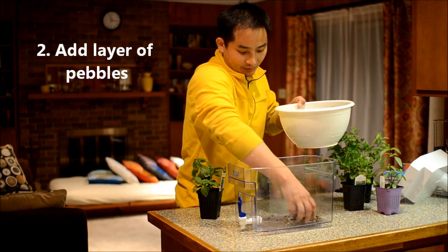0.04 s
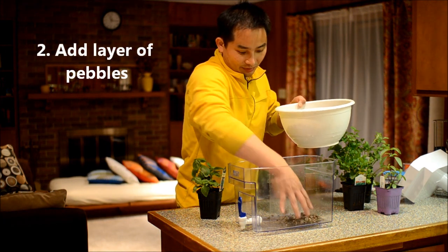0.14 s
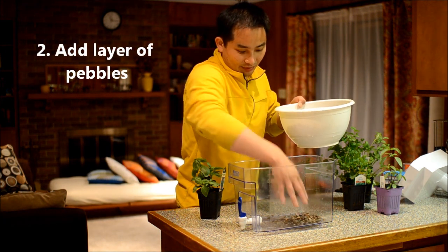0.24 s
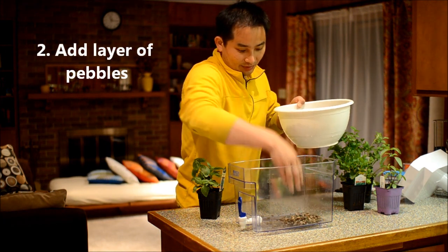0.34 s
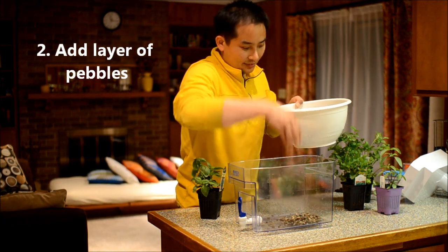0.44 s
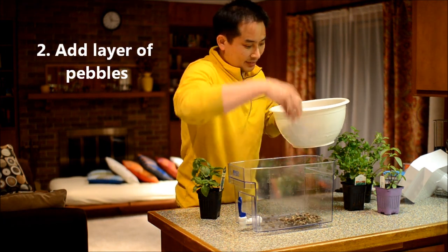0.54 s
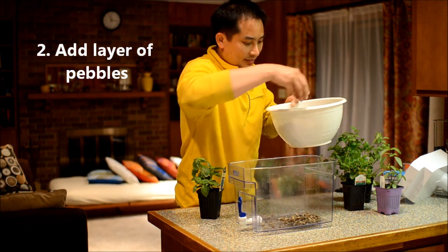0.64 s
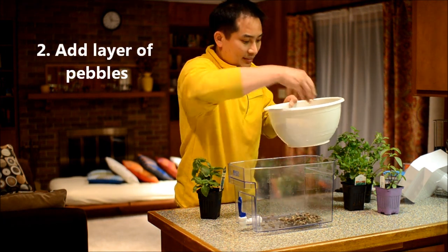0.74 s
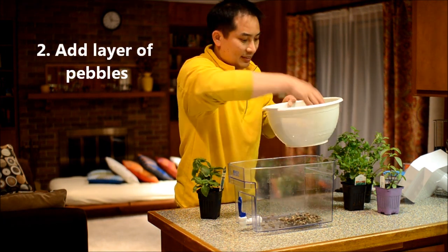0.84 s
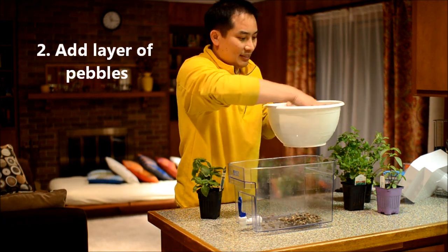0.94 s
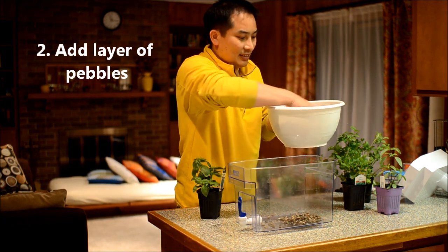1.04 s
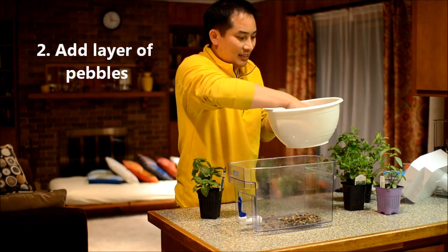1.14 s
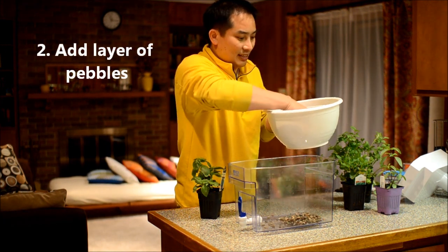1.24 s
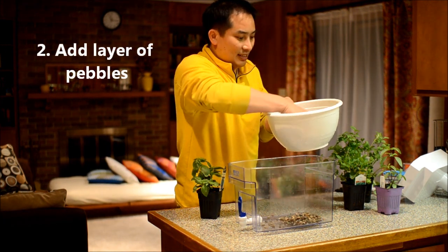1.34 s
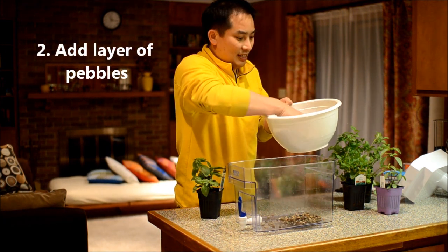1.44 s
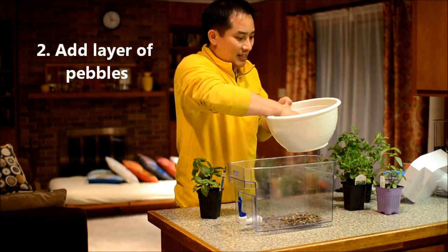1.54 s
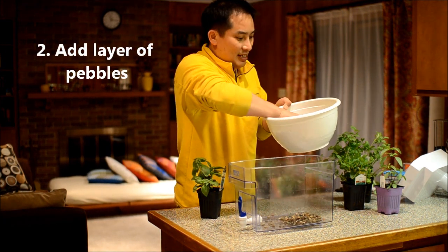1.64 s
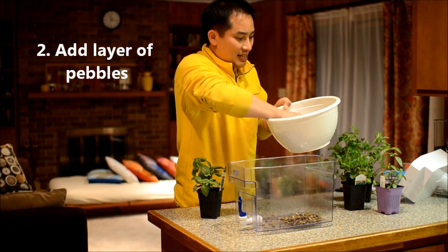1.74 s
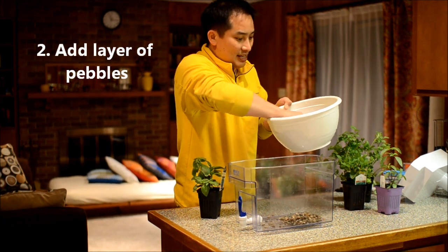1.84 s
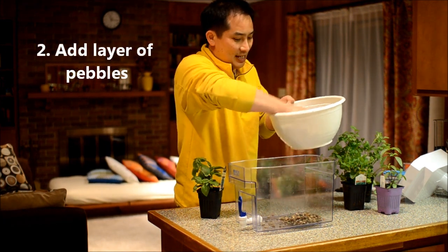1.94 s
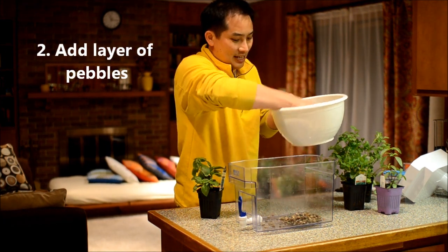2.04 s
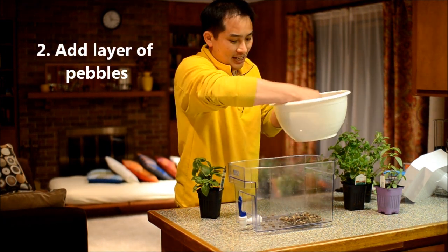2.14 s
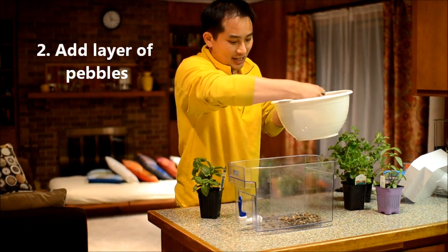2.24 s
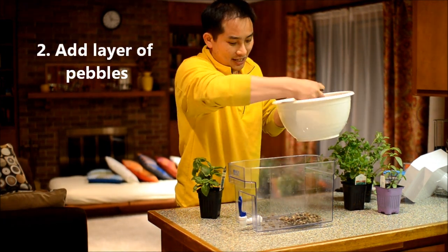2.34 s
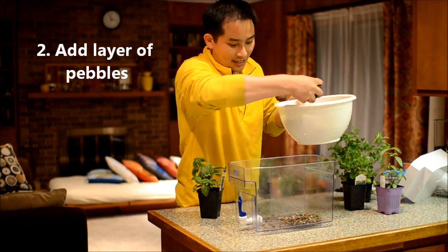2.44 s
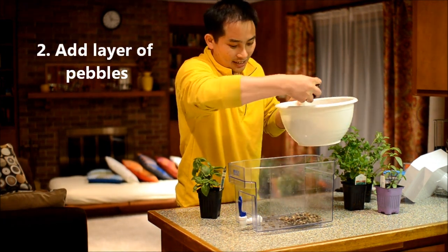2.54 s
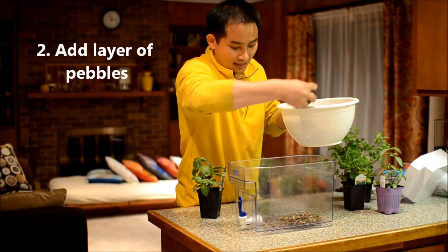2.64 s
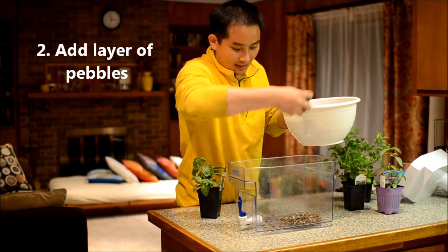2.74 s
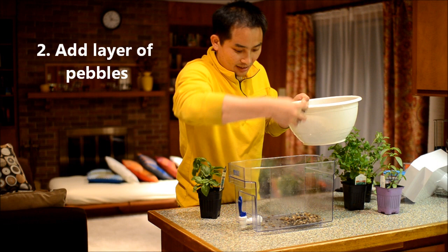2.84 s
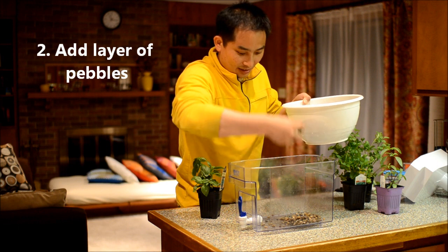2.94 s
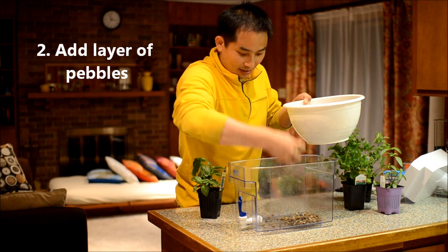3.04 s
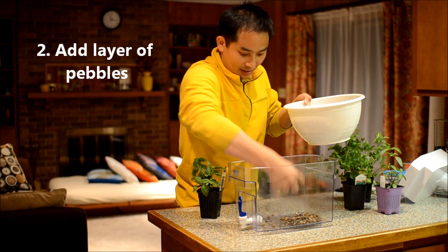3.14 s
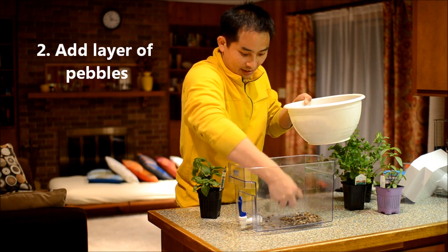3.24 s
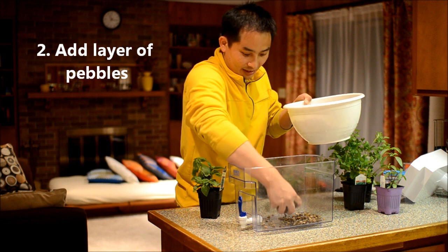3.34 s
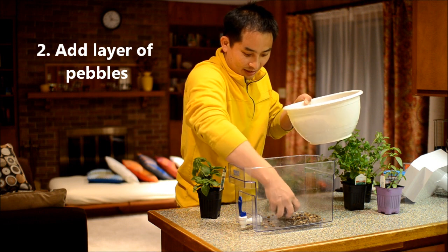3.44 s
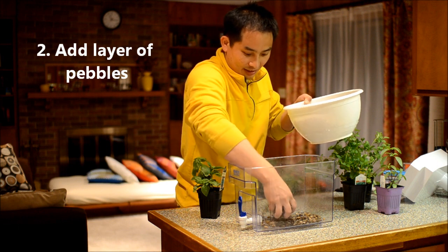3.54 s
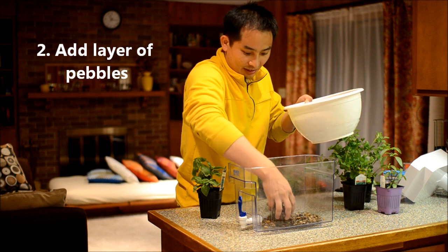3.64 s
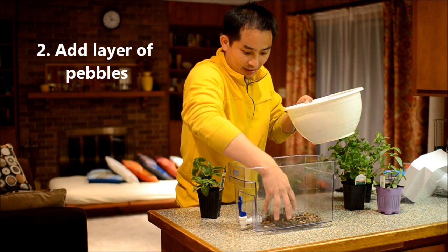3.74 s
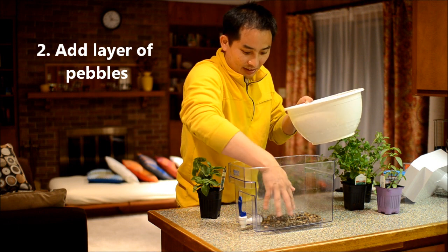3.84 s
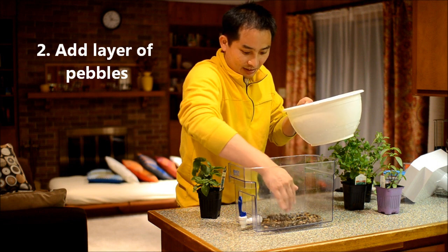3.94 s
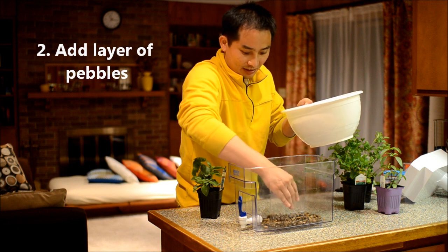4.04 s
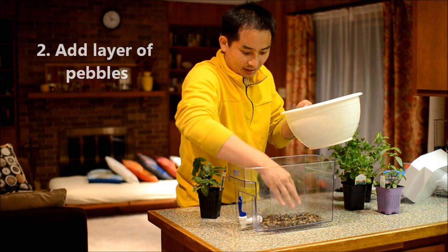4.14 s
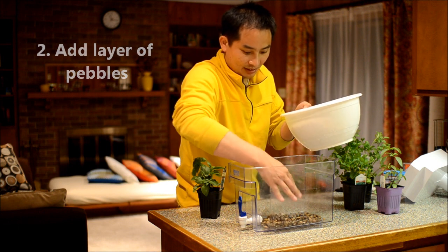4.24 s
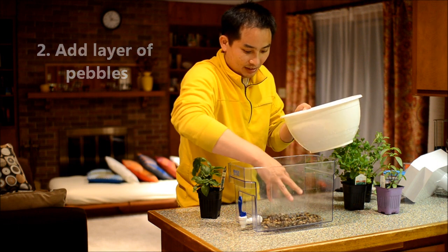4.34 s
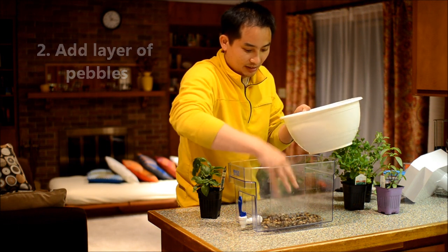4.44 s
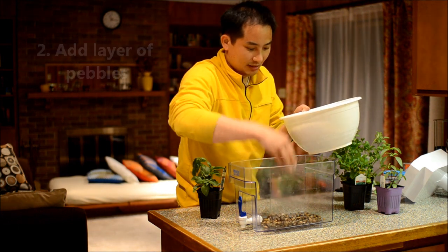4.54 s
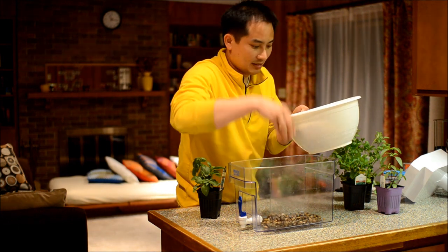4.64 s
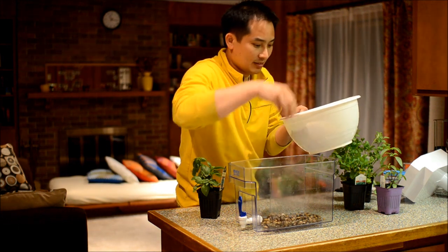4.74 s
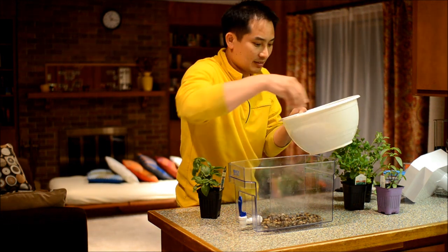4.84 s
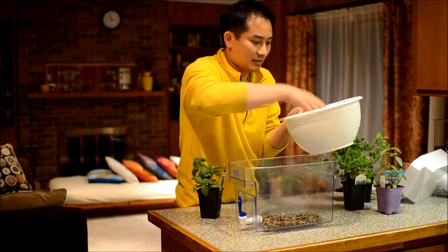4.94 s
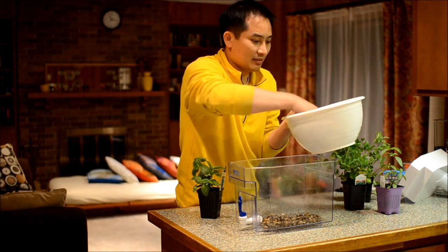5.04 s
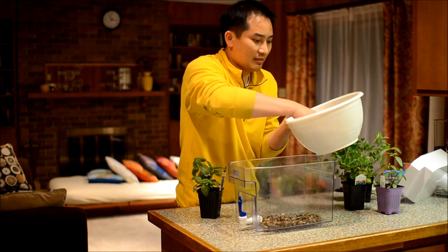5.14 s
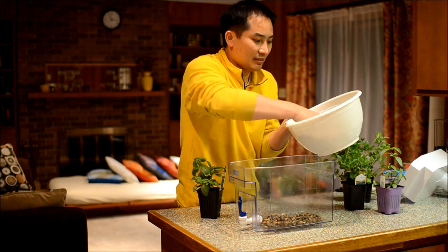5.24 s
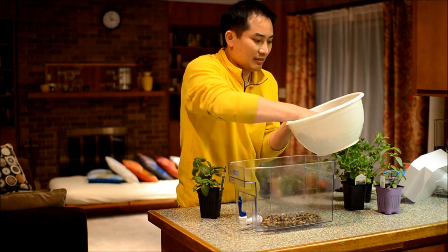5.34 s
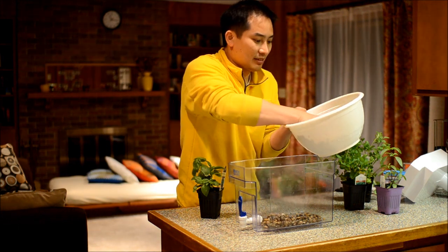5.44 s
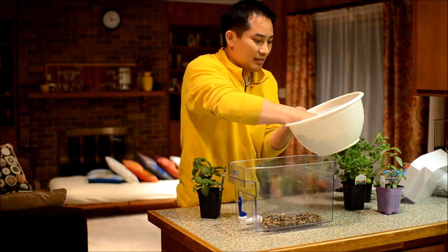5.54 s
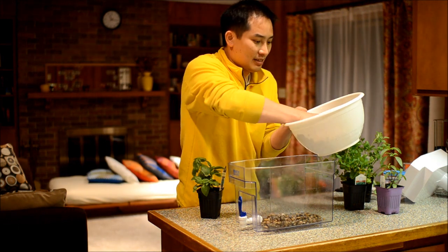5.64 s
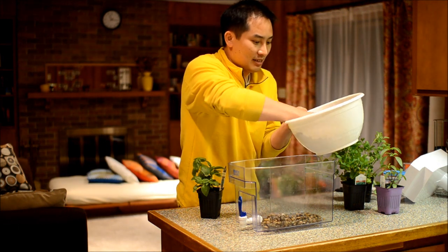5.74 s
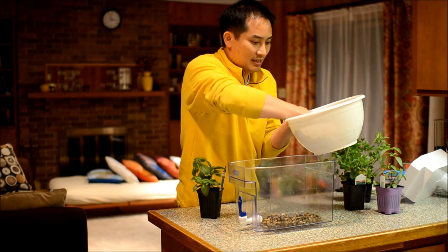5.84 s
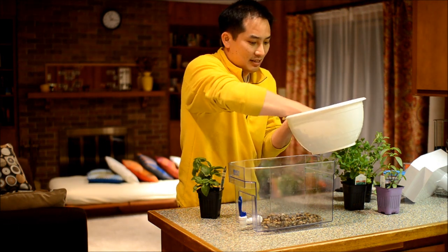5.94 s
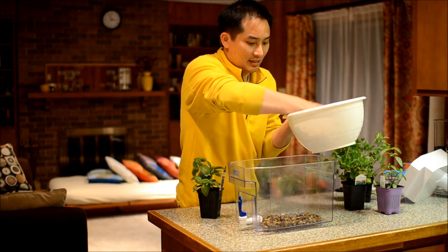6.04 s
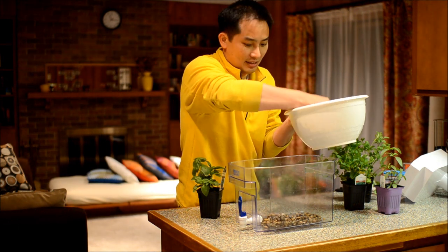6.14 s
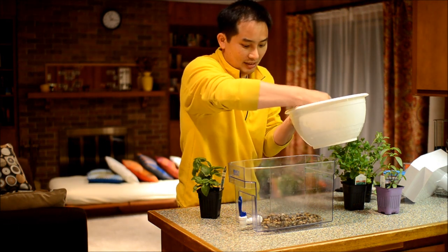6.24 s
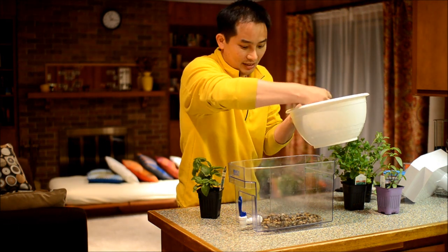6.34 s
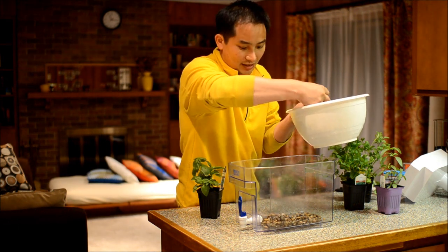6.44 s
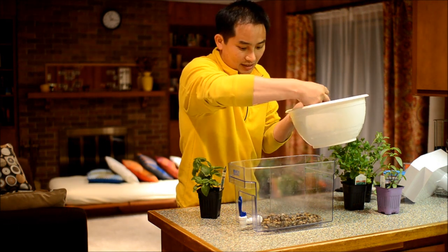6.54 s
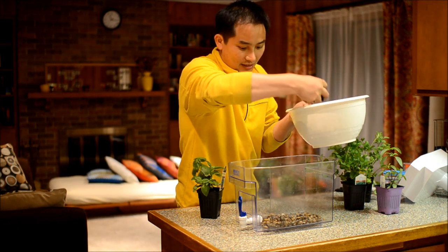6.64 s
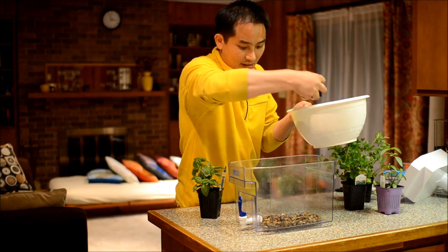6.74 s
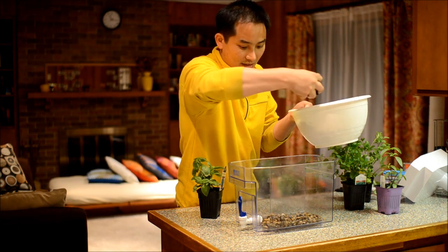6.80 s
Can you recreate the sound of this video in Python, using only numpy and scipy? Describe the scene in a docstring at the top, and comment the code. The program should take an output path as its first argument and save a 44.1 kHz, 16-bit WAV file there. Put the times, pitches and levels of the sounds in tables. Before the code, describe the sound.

A handful of gravel clatters brightly onto the bottom of a plastic tank. Fingers then rake through stones in a plastic bowl, crunching and grinding, with a few duller knocks. A second, longer handful rattles into the tank, and the scooping resumes with a soft bump against the bowl. One small microphone picks it up in a quiet living room with short reverberation.

```python
"""Gravel rattles into an empty plastic tank on a counter, scooped by the handful from a plastic bowl.
Each impact is a short broadband clack that excites the modes of the tank's panels or the duller bowl;
many impacts at random times superpose into a stream. The hand bumps the bowl and the counter booms.
A living room adds reverberation and faint steady air, all heard through one small microphone."""
import sys
import numpy as np
from scipy import signal
from scipy.fft import rfft, irfft
from scipy.io import wavfile

SR = 44100
rng = np.random.default_rng(int(sys.argv[2]) if len(sys.argv) > 2 else 0)


def waveform_to_disk(signal):
    """Save audio, clipped to [-1, 1], as 16-bit WAV at the path in sys.argv[1]."""
    frames = np.transpose(np.atleast_2d(signal))
    scaled = np.clip(frames, -1, 1) * 32767
    samples = np.round(scaled).astype(np.int16)
    wavfile.write(sys.argv[1], SR, samples)


N = 302967

# Levels are relative within a table. For stones, level is that of the middle band;
# weight is the low band against it, hardness the top band against it.
# gravel let go from the hand into the tank:
# (start [s], swell [s], fade onset [s], level [dB], fade [dB/s], weight [dB], hardness [dB])
TANK_POURS = [(0, 0.0016, 0.18, -14.5, 80.5, -11, -1.5), (0.3, 0.027, 0.018, -23, 115, -14, 5.5),
              (0.51, 0.014, 0.091, -34, 83, -29, -25), (3.01, 0.0078, 0.014, -23, 133, -7.5, 1),
              (3.17, .02, 0.016, -28.5, 118, -6.5, 5.5), (3.25, 0.008, 0.056, -24, 58, -3, 2),
              (3.38, .08, 0.3, -16, 70.5, -8, 0), (3.68, 0.016, 0.12, -14.5, 91, -13.5, -7),
              (4.03, .03, 0.028, -28, 116, -27, -40), (4.335, 0.013, 0.027, -46, 110, -11, -11)]
# single stones landing in the tank: (time [s], level [dB], hardness [dB])
TANK_LANDINGS = [(0.0652, -9.5, -1), (0.1362, -8, -3.5), (0.183, -11, -12.5), (0.2955, -11, 1.5),
                 (0.386, -16.5, -1), (0.5668, -25.5, 4), (0.5996, -36.5, 21.5), (0.7042, -30, 6.5),
                 (0.7734, -30.5, 1.5), (3.0097, -10.5, 2), (3.1665, -11.5, 7), (3.2465, -12, -0.5),
                 (3.2617, -8.5, 3.5), (3.2921, -12, 3), (3.3694, -6.5, 0), (3.4348, -2, -4.5),
                 (3.537, -6, -3.5), (3.701, -10, -4), (3.806, -10.5, -7), (3.8576, -8, -5),
                 (4.0405, -23.5, -15), (4.1252, -23, -16), (4.15, -24, -12), (4.3316, -34.5, -8),
                 (4.4149, -37.5, -20)]
# spectrum of stone on the tank: (frequency [Hz], level [dB])
TANK_SPECTRUM = [(88, -59.5), (150, -41.5), (359, -10), (419, -9.5), (561, -3.5), (826, -5.5), (1170, -2.5),
                 (1540, -4.5), (4640, -4.5), (5740, -4.5), (8460, -2.5), (15400, -32.5)]
# modes of the tank's panels: (frequency [Hz], bandwidth [Hz], gain [dB])
TANK_PANEL_MODES = [(361, 18, 3), (535, 35, 0), (573, 18, 10), (987, 20, 6), (1042, 20, 5), (1134, 20, 3),
                    (1191, 28, 6), (1372, 16, 1), (1643, 25, -2), (1932, 40, -5), (2208, 30, -5),
                    (3222, 25, -5), (4161, 40, -5), (4560, 32, -5)]
# boom of the counter: (frequency [Hz], bandwidth [Hz], gain [dB])
COUNTER_BOOM = [(209, 10, 12)]
# reverberation time of the room: (frequency [Hz], T60 [s])
ROOM_DECAY = [(150, 0.21), (500, 0.21), (2000, 0.36), (4000, 0.26), (9000, 0.22), (15000, .22)]
# spectrum of the still room: (frequency [Hz], level [dB])
AIR_SPECTRUM = [(25, -10), (90, -4.5), (250, -1.5), (450, -3), (1000, -8), (2500, -14.5), (5000, -18.5),
                (9000, -27.5), (15000, -35)]
# strokes of the fingers through the gravel in the bowl:
# (start [s], swell [s], fade onset [s], level [dB], fade [dB/s], weight [dB], hardness [dB])
BOWL_SCOOPS = [(0.81, 0.021, 0.022, -36, 113, -6.5, -2), (0.9, 0.026, 0.037, -34.5, 108, -14.5, -11),
               (0.965, 0.023, 0.15, -21.5, 214, -15, -7.5), (1.218, 0.035, 0.08, -25, 109, -8.5, -4),
               (1.52, 0.064, .15, -25.5, 73, -8, -2.5), (1.68, 0.028, 0.16, -29.5, 98, -13, -3),
               (2.06, 0.026, .18, -65, 52.5, -7.5, 11.5), (4.85, .03, .04, -63, 70, -6, -14),
               (4.935, 0.023, 0.022, -34.5, 131, -17, -8), (5.015, 0.056, 0.045, -29, 192, -6, -12),
               (5.143, 0.065, 0.061, -20, 76.5, -11, -5.5), (5.34, 0.017, 0.31, -30, 66, -5.5, -2),
               (5.56, 0.055, 0.15, -18.5, 123, -20, -7.5), (5.79, 0.02, 0.039, -31.5, 150, -11.5, -0.5),
               (5.94, 0.0095, 0.024, -44.5, 72, -7.5, 9), (6.17, .02, 0.012, -48, 68, -9, 5.5)]
# spectrum of gravel grinding in the bowl: (frequency [Hz], level [dB])
SCOOP_SPECTRUM = [(88, -91), (150, -46), (453, -0.5), (499, -8.5), (1020, 0), (1290, -7), (2140, -8),
                  (5110, -7.5), (5740, -8), (7830, -6), (11800, -21), (15400, -44.5)]
# single stones slipping back into the bowl: (time [s], level [dB], hardness [dB])
BOWL_KNOCKS = [(0.827, -24.5, 3), (1.0299, -17, -1), (1.2343, -25, -16), (1.3407, -19.5, -16),
               (1.5294, -25, -17), (1.829, -21.5, -1), (1.9021, -26, -3.5), (1.9954, -25, -2),
               (2.2673, -70, 22), (2.2886, -40, -38), (2.5204, -56, -1), (2.6186, -23.5, -14.5),
               (4.9376, -40, -9), (4.9467, -34.5, 0), (5.4934, -21, -13), (5.72, -12.5, -8),
               (5.8227, -17, -3), (6.0217, -33.5, 4.5), (6.104, -31.5, 8.5), (6.1468, -20, 1),
               (6.5075, -55, 18), (6.5331, -33, 6.5), (6.624, -39.5, 7), (6.696, -55, 13.5)]
# spectrum of a lone stone on the hollow bowl: (frequency [Hz], level [dB])
KNOCK_SPECTRUM = [(150, -31), (400, -15), (1350, -4.5), (1600, -3), (2200, -3.5), (2500, 0.5),
                  (5000, -15.5), (8500, -23.5), (15000, -49)]
# modes of the bowl's wall: (frequency [Hz], bandwidth [Hz], gain [dB])
BOWL_WALL_MODES = [(1000, 30, -3), (1800, 170, -3), (2060, 180, 0), (2230, 60, -5)]
# bumps of the hand against the bowl: (time [s], level [dB], T60 [s])
HAND_BUMPS = [(5.404, -43, 0.18), (5.437, -25, 0.11), (5.476, -36, 0.22)]
# spectrum of a bump: (frequency [Hz], level [dB])
BUMP_SPECTRUM = [(25, -6), (55, -9), (90, -17), (150, -11), (210, -3), (300, -6), (430, -2), (520, 4),
                 (700, -12), (4000, -70)]
# notches of the microphone housing: (frequency [Hz], bandwidth [Hz], depth [0-1])
HOUSING_NOTCHES = [(5730, 400, .78), (6900, 150, .72)]

TIME = np.arange(N) / SR


def amp(db):
    """Amplitude ratio of a level in decibels."""
    return 10 ** (np.asarray(db) / 20)


def unit(x):
    """Normalisation to rms 1."""
    return x / np.sqrt(np.mean(x ** 2) + 1e-20)


def value_at(points, hz):
    """Interpolation of (frequency, value) points on a logarithmic frequency axis."""
    frequencies, values = np.transpose(points)
    return np.interp(np.log(hz + 1), np.log(frequencies + 1), values)


def add(mix, start_s, sound):
    """Linear superposition of a sound on the mix."""
    part = mix[max(round(start_s * SR), 0):][:len(sound)]
    part += sound[:len(part)]


def colour(x, spectrum, size=2048):
    """Minimum-phase filter: the phase follows from the log gain by the Hilbert transform."""
    hz = abs(np.fft.fftfreq(size, 1 / SR))
    log_gain = np.log(amp(np.maximum(value_at(spectrum, hz), -100)))
    taps = np.fft.ifft(np.exp(np.conj(signal.hilbert(log_gain)))).real
    return signal.oaconvolve(x, taps[:size // 2])[:len(x)]


def resonate(x, hz, width):
    """Second-order resonator with unit gain at its peak."""
    return signal.lfilter(*signal.iirpeak(hz, hz / width, fs=SR), x)


def bands(x, low_hz=1200, top_hz=5000):
    """Zero-phase crossover into low, middle and top bands, each at rms 1."""
    cuts = [(low_hz, "low"), ((low_hz, top_hz), "band"), (top_hz, "high")]
    filters = [signal.butter(2, hz, kind, fs=SR, output="sos") for hz, kind in cuts]
    return [unit(signal.sosfiltfilt(sos, x, padtype=None)) for sos in filters]


def balance(x, level_db, weight_db, hardness_db):
    """Spectral balance of impact: heavy contacts gain bass, stone against stone gains treble."""
    low, middle, top = bands(x)
    return amp(level_db) * (amp(weight_db) * low + middle + amp(hardness_db) * top)


def clack(t60, ping_db, size=4096):
    """Impulse response of one contact: dense wall modes decay as noise, the stone as three brief pings."""
    t = np.arange(size) / SR
    walls = unit(rng.standard_normal(size) * amp(-60 * t / t60))
    ping_hz = 1600 * 6.2 ** rng.random((3, 1))
    pings = unit(np.sin(2 * np.pi * ping_hz * t).sum(0) * amp(-60 * t / 0.027))
    return unit(walls + amp(ping_db) * pings)


def flow_db(swell_s, fade_onset_s, level_db, fade_db_per_s, range_db=45, clump_s=0.02):
    """Envelope of granular flow: it swells, holds and decays exponentially, wavering as clumps pass."""
    t = np.arange(1, (fade_onset_s + range_db / fade_db_per_s) * SR) / SR
    clumps_db = rng.standard_normal(400)
    waver_db = np.interp(t, clump_s * np.arange(len(clumps_db)), clumps_db)
    swell_db = 20 * np.log10(np.minimum(t / swell_s, 1))
    fade_db = fade_db_per_s * np.maximum(t - fade_onset_s, 0)
    return level_db + swell_db - fade_db + waver_db


def gravel_stream(runs, spectrum, peak_per_s, spread_db, t60, ping_db):
    """Poisson process of impacts: stones of random size fall more thickly as the flow grows."""
    out = np.zeros(N)
    strongest_db = max(run[3] for run in runs)
    stones = [clack(t60, ping_db) for _ in range(60)]
    for start_s, swell_s, fade_onset_s, level_db, fade_db_per_s, weight_db, hardness_db in runs:
        envelope_db = flow_db(swell_s, fade_onset_s, level_db, fade_db_per_s)[:N]
        rate = peak_per_s * amp(0.28 * (envelope_db - strongest_db))
        chance, size, kind = rng.random((3, N))[:, :len(rate)]
        rattle = np.zeros(len(rate))
        for i in np.flatnonzero(chance < rate / SR):
            size_db = spread_db * min(-np.log(size[i]), 3)
            strength = amp(size_db) / np.sqrt(rate[i])  # incoherent impacts add in power
            add(rattle, i / SR, strength * stones[int(kind[i] * len(stones))])
        add(out, start_s, balance(colour(rattle, spectrum), envelope_db, weight_db, hardness_db))
    return out


def single_stones(impacts, spectrum, t60, ping_db, restitution, weight):
    """Inelastic collision: a clack is followed by three ever weaker rebounds milliseconds apart."""
    out = np.zeros(N)
    for start_s, level_db, hardness_db in impacts:
        stone = clack(t60, ping_db)
        rebounds_s = np.cumsum(rng.uniform(.002, .007, 3))
        for k, delay_s in enumerate(rebounds_s, 1):
            add(stone, delay_s, restitution ** k * clack(t60, ping_db))
        weight_db = weight(level_db, hardness_db)
        add(out, start_s, balance(colour(stone, spectrum), level_db, weight_db, hardness_db))
    return out


def ring(x, modes):
    """Modal resonance: a struck body rings on at its natural frequencies."""
    return x + sum(amp(db) * resonate(x, hz, width) for hz, width, db in modes)


def room_response(size=24000, echoes_per_s=4000, build_s=0.0064):
    """Absorption: sparse reflections off counter and walls decay at a rate set by frequency."""
    taps = rng.choice([-1., 1.], size) * (rng.random(size) < echoes_per_s / SR)
    taps *= np.clip(np.arange(size) / SR / build_s, 0, 1) ** 2
    hz, t, spectra = signal.stft(taps, SR, nperseg=256)
    decay = amp(-60 * t / value_at(ROOM_DECAY, hz)[:, None])
    echoes = signal.istft(spectra * decay, SR, nperseg=256)[1]
    return echoes / np.linalg.norm(echoes)


def room(x, wet_db, spots=4, crossfade_hz=47):
    """Reflections depend on source position: cycling through responses varies each stone's spot."""
    phase = 2 * np.pi * crossfade_hz * TIME
    shares = [np.maximum(np.cos(phase + 2 * np.pi * k / spots), 0) for k in range(spots)]
    echoes = sum(signal.oaconvolve(x * share, room_response())[:N] for share in shares)
    return x + amp(wet_db) * echoes


def tank():
    """Impact excitation of the tank's panels: stronger landings flex the bottom more and gain bass."""
    landings = single_stones(TANK_LANDINGS, TANK_SPECTRUM, t60=0.036, ping_db=-8.5, restitution=0.78,
                             weight=lambda level_db, hardness_db: -9.5 + 0.44 * level_db)
    pours = gravel_stream(TANK_POURS, TANK_SPECTRUM, peak_per_s=720, spread_db=2.5, t60=0.027, ping_db=-7)
    gravel = amp(-17) * landings + amp(-5.5) * pours
    return ring(room(gravel, wet_db=-5), TANK_PANEL_MODES)


def room_air(hum_hz=49):
    """Ambient noise floor: faint stationary noise and a low pure-tone hum."""
    gain = amp(value_at(AIR_SPECTRUM, np.fft.rfftfreq(N, 1 / SR)))
    air = irfft(rfft(rng.standard_normal(N)) * gain, N)
    hum = np.sin(2 * np.pi * hum_hz * TIME)
    return amp(-63) * unit(air) + amp(-79.5) * unit(hum)


def settling_grains(per_s=8):
    """Sparse shot noise: now and then a tiny grain shifts with a high tick."""
    shifts = (rng.random(N) < per_s / SR) * rng.random(N)
    ticks = signal.oaconvolve(shifts, clack(t60=0.04, ping_db=0))[:N]
    return bands(colour(ticks, TANK_SPECTRUM))[-1]


def bowl():
    """Impact excitation of the softer bowl: stones sound duller and heavier on its wall than on stone."""
    knocks = single_stones(BOWL_KNOCKS, KNOCK_SPECTRUM, t60=0.091, ping_db=-17, restitution=0.37,
                           weight=lambda level_db, hardness_db: -15.5 - 0.29 * hardness_db)
    scoops = gravel_stream(BOWL_SCOOPS, SCOOP_SPECTRUM, peak_per_s=1100, spread_db=2.2,
                           t60=0.044, ping_db=-10)
    contacts = amp(-20) * knocks + amp(-5) * scoops + hand_bumps() + amp(-77.5) * settling_grains()
    return ring(room(contacts, wet_db=-3), BOWL_WALL_MODES)


def hand_bumps():
    """Soft contact: the hand excites mainly the bowl's low frequencies, which decay exponentially."""
    out = np.zeros(N)
    t = np.arange(SR // 2) / SR
    for start_s, level_db, t60 in HAND_BUMPS:
        thud = unit(colour(rng.standard_normal(len(t)), BUMP_SPECTRUM))
        add(out, start_s, amp(level_db - 60 * t / t60) * thud)
    return out


def scene():
    """Forced vibration: tank and bowl drive the counter's resonance, over the air of the room."""
    return (ring(tank() + bowl(), COUNTER_BOOM) + room_air())[None]


def record(dry, ceiling=0.9, cutoff_hz=15550):
    """Microphone response: the housing cuts two notches, overload clips peaks, a low-pass ends the band."""
    x = dry[0]
    for hz, width, depth in HOUSING_NOTCHES:
        x = x - depth * resonate(x, hz, width)
    x = np.clip(x, -ceiling, ceiling)
    low_pass = signal.firwin(511, cutoff_hz, window=("kaiser", 9), fs=SR)
    return signal.oaconvolve(x, low_pass, "same")[None]


dry = scene()
out = record(dry)
waveform_to_disk(out)
```